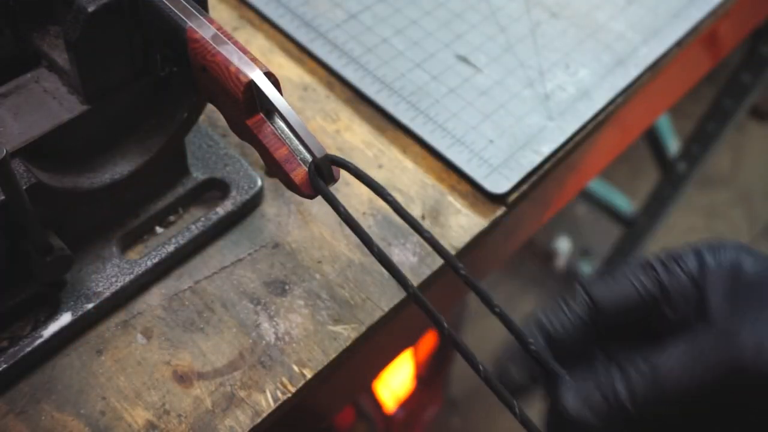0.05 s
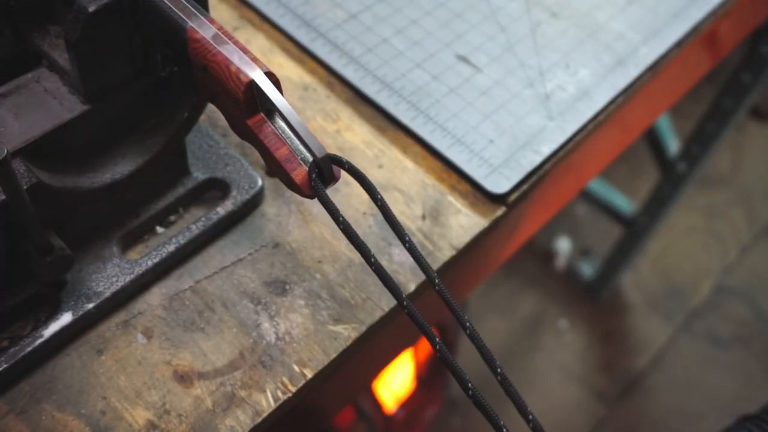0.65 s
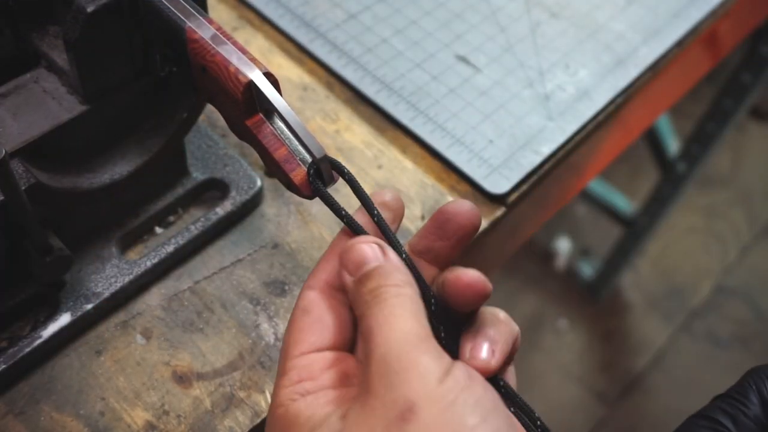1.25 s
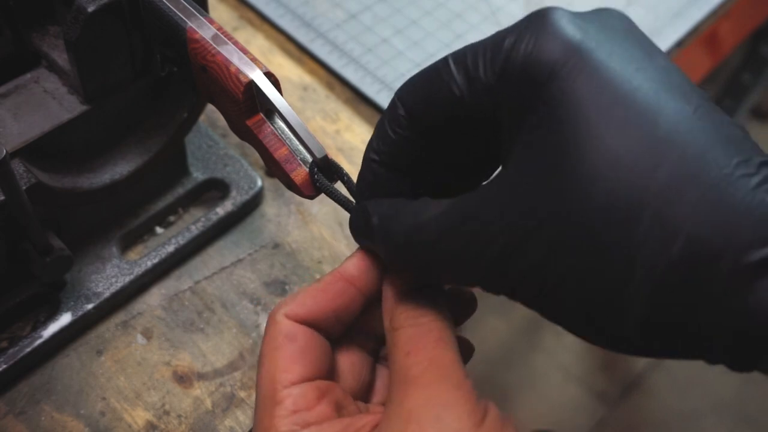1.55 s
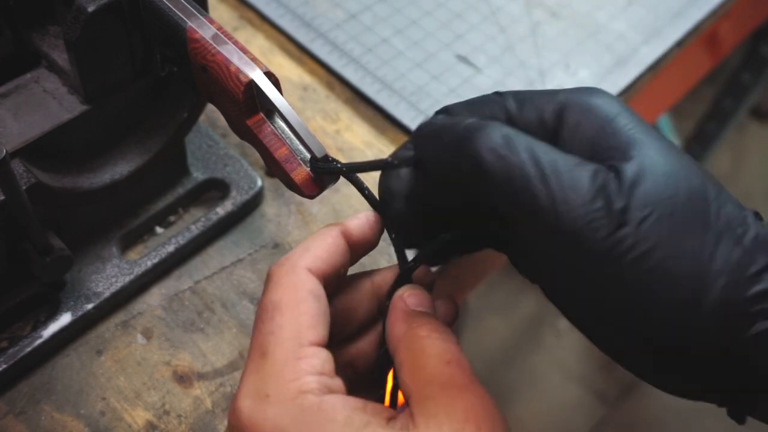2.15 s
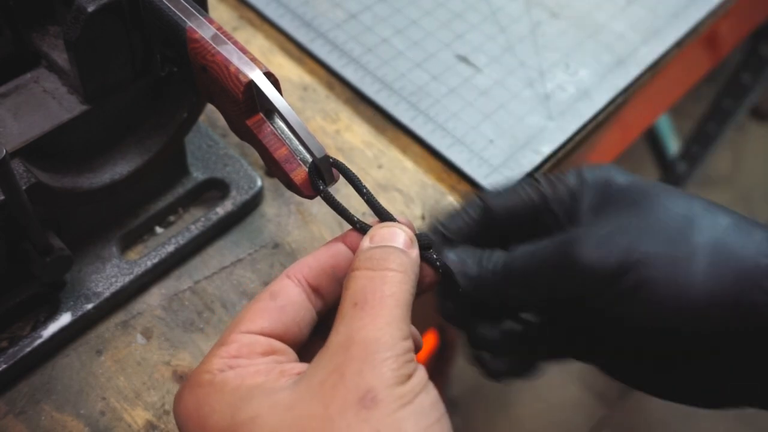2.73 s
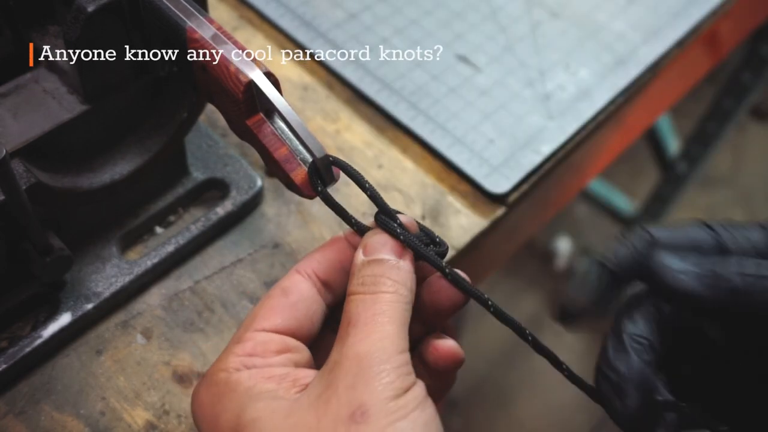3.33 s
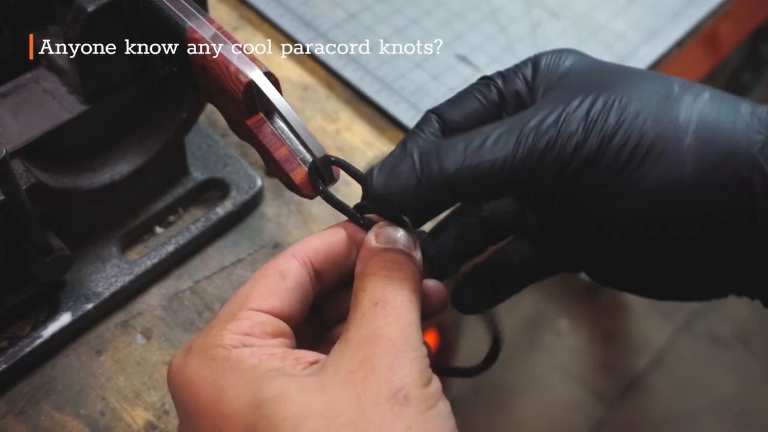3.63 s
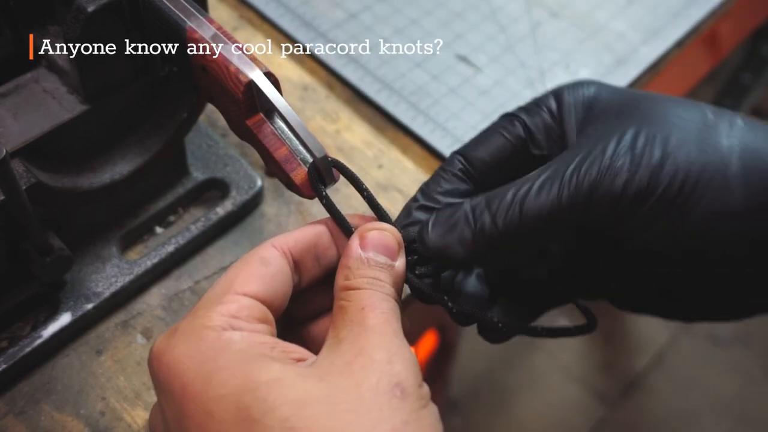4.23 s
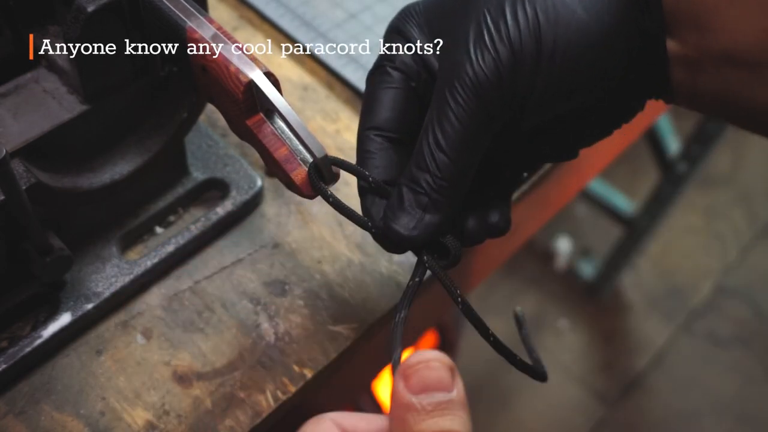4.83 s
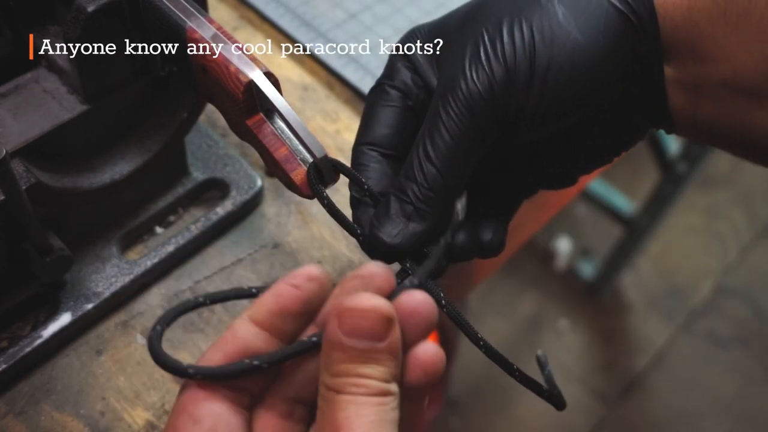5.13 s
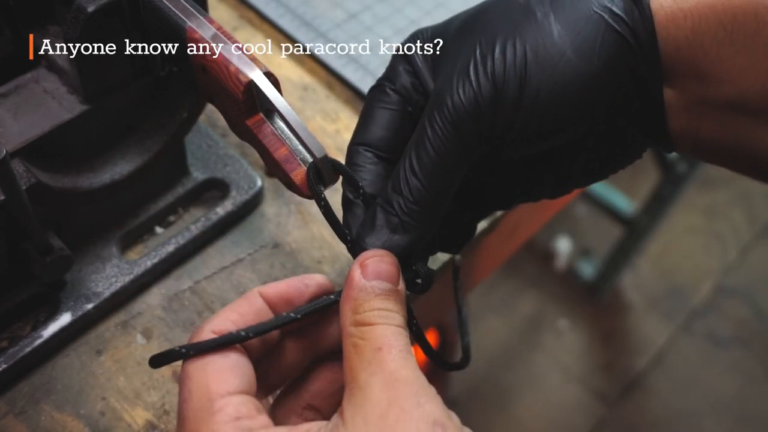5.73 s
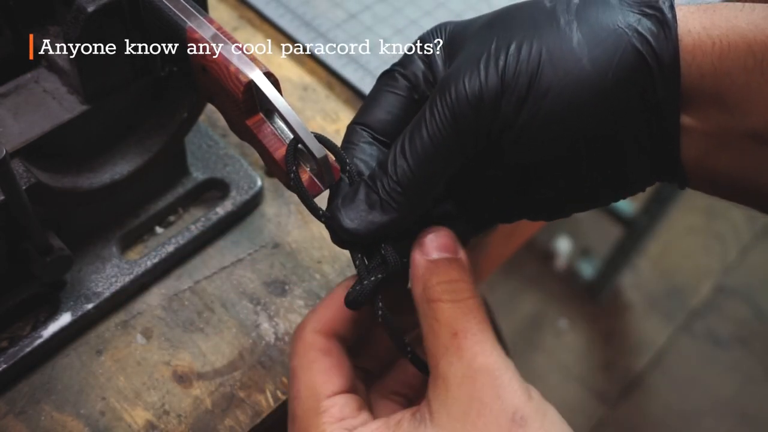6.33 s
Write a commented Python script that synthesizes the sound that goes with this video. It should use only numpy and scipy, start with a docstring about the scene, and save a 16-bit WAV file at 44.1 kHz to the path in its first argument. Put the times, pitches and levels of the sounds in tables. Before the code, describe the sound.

Nylon cord is pulled through a knife handle and knotted, with close hissing slides, finger rubs and small clicks.

```python
"""Threading a knife lanyard

Braided nylon cord is drawn through the hole of a knife handle held in a vice, then knotted, close up.
Each pull or finger rub is a swell of tiny fibre slips: a bright hiss from the sheath over a duller
rub of glove and hand. Fibres tick, fingers knock the handle and arms rustle. Behind it all sit
a low workshop rumble, a thin whine and a faint insect-like chirp."""
import sys
import numpy as np
from scipy import signal
from scipy.fft import rfft, irfft, next_fast_len
from scipy.io import wavfile
from scipy.ndimage import uniform_filter1d

SR = 44100
rng = np.random.default_rng(int(sys.argv[2]) if len(sys.argv) > 2 else 0)


def generate_wav(sig):
    """Save sig (samples, or channels by samples) to the path in sys.argv[1] as 16-bit PCM at SR."""
    pcm = np.round(np.clip(np.atleast_2d(sig).T, -1, 1) * 32767).astype(np.int16)
    wavfile.write(sys.argv[1], SR, pcm)


N = 285768

# bright tone of the sliding nylon sheath: (frequency [Hz], level [dB])
SHEATH = [(40, -74), (400, -25.5), (1500, -17), (2400, -13.5), (3150, -8.5), (4000, -5.5), (5000, -4),
          (8000, 0.5), (10500, 2), (16000, -0.5)]


def braid(speed, glove_db, slow_tilt_db, fast_tilt_db):
    """Cord catches and runs: fine slips hiss in the sheath, coarser ones rasp in the glove."""
    # dull tone of the rubbing glove: (frequency [Hz], level [dB])
    glove_tone = [(60, -35), (150, -25), (450, -8), (900, -10), (1400, -9.5), (1950, -1.5), (2550, -1.5),
                  (3200, -2.5), (4300, -1.5), (6000, -8.5), (16000, -54)]
    grip = undb(2.5 * walk(len(speed), rate=170)) * speed ** 0.85
    fine = echoes(slips(speed, rate=10000, spread_db=4.8, shared=0.2), t60=.012, wet_db=-7.5)
    hiss = (1 - speed) * colour(fine, SHEATH, slow_tilt_db) + speed * colour(fine, SHEATH, fast_tilt_db)
    coarse = echoes(slips(speed, rate=2500, spread_db=5.0, shared=0.2), t60=.025, wet_db=-3.5)
    rub = colour(coarse, glove_tone)
    return (unit(hiss * grip) + undb(glove_db) * unit(rub * grip)) * rms(speed)


def draws(stop_db_per_s=397):
    """Cord runs through the hole, louder and brighter the faster it goes, and stops quickly."""
    # effort curves of three pulls: (time [s], level [dB])
    first_draw = [(0.0, -32), (0.168, -28.5), (0.316, -39.5), (0.416, -38), (0.42, -34.5), (0.56, -45.5),
                  (0.664, -41), (0.83, -49.5), (0.88, -58)]
    quick_draw = [(2.28, -25), (2.31, -33), (2.362, -23), (2.416, -29.5), (2.434, -43), (2.5, -50)]
    last_draw = [(6.015, -43), (6.123, -34), (6.133, -30.5), (6.161, -30), (6.171, -43.5), (6.2, -48)]
    # (effort curve, gain [dB], slow tilt [dB/octave], fast tilt [dB/octave], glove over hiss [dB])
    pulls = [(first_draw, 3.26, -3.5, .8, -19),
             (quick_draw, 3.8, -1.9, 2.5, -15),
             (last_draw, 4.9, 0, 8, -23)]
    out = np.zeros((2, N))
    for curve, gain_db, slow_tilt_db, fast_tilt_db, glove_db in pulls:
        times, effort_db = np.transpose(curve)
        start, end = times[0], times[-1]
        t = start - .1 + np.arange(next_fast_len(int((end - start + .2) * SR))) / SR
        db = np.interp(t, times, effort_db) - stop_db_per_s * np.abs(t - t.clip(start, end))
        speed = undb(db - db.max())
        add(out, t[0], undb(db.max() + gain_db) * braid(speed, glove_db, slow_tilt_db, fast_tilt_db))
    return out


def stroke(s, rise, fall, db, glove_db, tilt_db):
    """One short slide that is fastest at time s; returns its start time and its sound."""
    t = np.arange(next_fast_len(int(3 * (rise + fall) * SR))) / SR - 3 * rise
    speed = np.exp(-np.abs(t / np.where(t < 0, rise, fall)) ** 1.26)
    return s + t[0], undb(db) * braid(speed, glove_db, tilt_db, tilt_db)


def rubs(rise_s=.016):
    """Fingers shift their hold along the cord: soft swells, duller the harder the glove presses."""
    # finger slides: (peak time [s], fall [s], level [dB], glove over hiss [dB])
    slides = [(.505, .02, -38, -19), (.655, 0.058, -42, -11), (1.62, 0.0084, -31, -13.5),
              (2.04, 0.063, -41, -5), (2.266, .03, -27.5, -6), (2.633, 0.032, -28, -17.5),
              (2.677, 0.017, -25, -13.5), (2.717, 0.053, -33, -12.5), (2.812, .012, -29.5, -12),
              (2.84, .028, -31, -8.5), (2.944, 0.011, -42, -5), (2.985, .015, -33.5, -14),
              (3.056, 0.01, -28.5, -17.5), (3.265, 0.027, -32.5, -17), (3.303, 0.042, -28, -12.5),
              (3.393, .018, -25.5, -10.5), (3.476, 0.026, -26.5, -13.5), (3.573, 0.017, -33.5, -9.5),
              (3.603, 0.042, -36, -5.5), (3.735, 0.012, -56, 15), (3.807, 0.027, -37, -5),
              (4.155, .04, -37.5, -11), (4.242, 0.042, -38.5, -7.5), (4.731, 0.034, -41.5, 1),
              (4.903, 0.063, -35, -19), (5.04, 0.043, -39, -20), (5.123, 0.011, -29.5, -29),
              (5.202, 0.015, -37, -22), (5.255, 0.031, -38.5, -18), (5.38, 0.022, -40, -14),
              (6.435, 0.038, -33.5, -10)]
    out = np.zeros((2, N))
    for s, fall, db, glove_db in slides:
        add(out, *stroke(s, rise_s, fall, db, glove_db, tilt_db=-2.5 - 0.19 * glove_db))
    return out


def tugs(rise_s=.0035):
    """The cord is jerked taut against the handle: a dark rasp that bites at once."""
    # jerks: (peak time [s], fall [s], level [dB], glove over hiss [dB])
    jerks = [(2.156, .053, -29, 1.5), (3.23, .014, -24.5, -10.5), (3.786, .011, -30, -1)]
    out = np.zeros((2, N))
    for s, fall, db, glove_db in jerks:
        add(out, *stroke(s, rise_s, fall, db, glove_db, tilt_db=-4))
    return out


def snags(rise_s=.0037, fall_s=.0056):
    """The braid snags and jumps free: a scratch that is over in milliseconds."""
    # catches: (peak time [s], level [dB], tilt [dB/octave])
    catches = [(.425, -25.5, 7), (1.974, -21.5, 6.5), (2.108, -24, -2.5), (2.12, -32.5, -4),
               (2.204, -25, 7), (2.264, -9.5, 2.5), (2.609, -30, 0), (2.975, -27.5, 0), (3.183, -32.5, 0),
               (3.397, -20.5, 5), (3.491, -26, 3), (3.545, -26.5, -2), (4.585, -20, -1.8),
               (6.02, -32.5, -4.5), (6.137, -26, 7)]
    out = np.zeros((2, N))
    for s, db, tilt_db in catches:
        add(out, *stroke(s, rise_s, fall_s, db, glove_db=-20.5, tilt_db=tilt_db))
    return out


def feeding(uneven_db=2.7):
    """The cord creeps through the fingers all the while, faint and uneven."""
    # how busily the fingers feed it: (time [s], level [dB])
    effort = [(.85, -47), (1.3, -46.5), (1.8, -45), (2.55, -49.5), (3.13, -42.5), (3.7, -48), (3.97, -42),
              (4.4, -51), (4.62, -42.5), (5.06, -47), (5.52, -59), (5.76, -43), (5.95, -51), (6.48, -48)]
    size = next_fast_len(N)
    db = np.interp(np.arange(size) / SR, *np.transpose(effort)) + uneven_db * walk(size, rate=18)
    speed = undb(db - db.max())
    return undb(db.max()) * braid(speed, glove_db=-11, slow_tilt_db=3.5, fast_tilt_db=3.5)[:, :N]


def zips():
    """Taut cord zips over an edge, its ribs blurring into a narrow, bright band."""
    # runs over the edge: (peak time [s], half length [s], level [dB], pitch [Hz])
    runs = [(.035, .04, -35.5, 5970), (.145, 0.086, -31.5, 9700), (.35, 0.23, -57.5, 3000),
            (2.174, .02, -34, 1930), (2.264, 0.0024, -17, 8260), (2.358, 0.019, -30.5, 3260),
            (2.402, .014, -36.5, 2630), (2.45, 0.019, -43.5, 3120), (3.598, 0.02, -40.5, 4100),
            (4.585, 0.0047, -27.5, 6200)]
    return swells(runs, width=0.31, rate=9000, trim_db=0.5)


def ticks(ring_t60=0.0078, body_db=-7):
    """Fibres and glove snap free: a sharp click with a very short, broad ring."""
    # snaps: (time [s], peak level [dB], pitch [Hz], left minus right [dB])
    snaps = [(0.2977, -20, 11100, 1), (0.923, -25.5, 4000, 0), (1.5414, -23, 11400, 7),
             (1.7863, -22, 10300, -3), (1.8228, -19.5, 3600, 2), (1.9709, -14, 11300, 3),
             (2.2623, -5, 8100, 1), (3.91, -17.5, 12000, 6), (4.0382, -20, 15300, 7),
             (4.239, -18, 12400, 1), (5.7357, -13, 15200, 5), (6.1335, -20, 14600, 0.5)]
    out = np.zeros((2, N))
    for s, db, hz, pan_db in snaps:
        click = echoes(signal.unit_impulse(2048), ring_t60, wet_db=6)
        body = undb(body_db) * resonate(click, hz=5100, width_hz=3500)
        tick = resonate(click, hz, 0.25 * hz) + body
        add(out, s + 0.0011, tick / np.abs(tick).max() * undb(db), pan_db)
    return out


def knocks():
    """Fingers and cord strike the clamped handle: soft bumps ring its low modes, flicks the high."""
    # strikes: (time [s], level [dB], contact time [s])
    strikes = [(1.822, -40, 0.000079), (2.155, -34.5, 0.0014), (3.231, -27, 0.004), (3.696, -41, 0.00019),
               (3.786, -33, 0.00048), (3.898, -33.5, 0.00016), (3.951, -39.5, 0.00021),
               (4.039, -37, 0.000093), (4.377, -37.5, 0.00012), (5.736, -35.5, 0.00011)]
    # modes of handle and vice: (frequency [Hz], level [dB], t60 [s])
    modes = [(147, -1, 0.082), (472, -3, .05), (829, -2, 0.06), (1730, -8, 0.015), (2040, 0, .014),
             (2820, 2, 0.011), (4140, -3, 0.014), (6040, -6, .01)]
    out, t = np.zeros((2, N)), np.arange(SR // 4) / SR
    for s, db, contact in strikes:
        for hz, mode_db, t60 in modes:
            push = np.exp(-np.log(2 * hz * contact) ** 2)  # half a period of contact drives it best
            ring = np.sin(2 * np.pi * hz * t) * np.exp(-np.log(1000) * t / t60)
            add(out, s, ring[None] * push * undb(db + mode_db))
    return out


def arms():
    """Cloth and skin brush as the arms shift: a soft, dull, uneven rustle."""
    # arm moves: (peak time [s], half length [s], level [dB], centre [Hz])
    moves = [(.95, .2, -54, 305), (.92, 0.068, -54.5, 800), (1.14, 0.082, -53, 786),
             (2.25, .09, -49.5, 1040), (2.3, .13, -54, 330), (3.33, .16, -53, 478), (4.2, .2, -54, 288),
             (4.87, .045, -53.5, 790), (5.379, 0.15, -54, 266), (5.8, 0.87, -53.5, 180)]
    return swells(moves, width=0.76, rate=2000, trim_db=2.5)


def fidget(db=-57.5):
    """Glove and cord crackle, sparse and faint, under the pulls."""
    activity = undb(2.9 * walk(N, rate=20))
    crackle = slips(activity, rate=200, spread_db=8, shared=.6) * activity
    return undb(db) * colour(echoes(crackle, t60=.005, wet_db=3), SHEATH, tilt_db=-4)


def workshop(level_db=-44, wide_hz=400):
    """Room tone: a centred rumble, wide hiss above it and a thin, steady whine."""
    # tone of the room: (frequency [Hz], level [dB])
    room_tone = [(20, -6), (50, -2), (90, 0), (160, -3), (300, -8), (500, -17), (1000, -19.5), (2000, -23),
                 (4000, -23), (7000, -24.5), (12000, -24), (16000, -25)]
    # bands of the whine: (centre [Hz], width [Hz], level [dB])
    whine = [(13650, 110, -60.5), (15200, 110, -55)]
    mid, side = rng.standard_normal((2, N))
    f = freqs(side)
    side = irfft(rfft(side) * (f / np.hypot(f, wide_hz)) ** 1.24, N)  # keeps the bass centred
    air = colour(np.array([mid + side, mid - side]), room_tone)
    air *= undb(level_db + .5 * walk(N, rate=8.4))
    for hz, width_hz, db in whine:
        air += undb(db) * unit(resonate(rng.standard_normal((2, N)), hz, width_hz))
    return air


def chirps(hz=11280, width_hz=620, db=-49):
    """A narrow high rasp, like a far bush cricket, a little more than once a second."""
    # chirps: (start [s], end [s])
    spans = [(.5, .74), (1.53, 1.72), (2.4, 2.55), (2.97, 3.16), (3.82, 3.99), (4.58, 4.76), (5.6, 5.78),
             (6.44, 6.48)]
    t = np.arange(N) / SR
    gate = sum(1. * ((t > start) & (t < end)) for start, end in spans)
    singing = uniform_filter1d(gate, size=900)
    rasp = slips(singing.clip(0), rate=7300, spread_db=4, shared=0.33)
    rasp = resonate(resonate(rasp, hz, width_hz), hz, width_hz)
    return unit(rasp) * np.sqrt(np.mean(singing)) * singing * undb(db + 2 * walk(N, rate=100))


def swells(table, width, rate, trim_db):
    """Slips gathered round one pitch, swelling and fading; width is a fraction of that pitch."""
    out = np.zeros((2, N))
    for s, half_length, db, hz in table:
        t = np.arange(next_fast_len(int(5 * half_length * SR), real=True)) / SR - 2.5 * half_length
        speed = np.exp(-(t / half_length) ** 2)
        brush = slips(speed, rate, spread_db=4, shared=0.44)
        brush = resonate(resonate(brush, hz, width * hz), hz, width * hz) * speed ** 0.51
        add(out, s + t[0], unit(brush) * rms(speed) * undb(db + trim_db))
    return out


def slips(speed, rate, spread_db, shared):
    """Friction clicks of uneven size, denser with speed; a share reaches both sides alike."""
    shape = (3, len(speed))  # left, right, centre
    happens = rng.random(shape) < rate * np.sqrt(speed) / SR
    signs = rng.choice([-1, 1], shape)
    clicks = happens * signs * undb(spread_db * np.clip(rng.standard_normal(shape), -2, 2))
    return np.sqrt(shared) * clicks[2] + np.sqrt(1 - shared) * clicks[:2]


def at_hand(x):
    """Pan a sound to follow the working hand."""
    # hand position: (time [s], left minus right [dB])
    hand_path = [(0, -2.5), (.16, -4), (.45, -1), (2.15, 0.5), (2.27, -0.5), (2.4, -5.5), (2.7, -6),
                 (2.95, 1.5), (3.24, 1.5), (3.39, -5), (3.6, -2), (3.8, 1.5), (4.2, -2), (4.65, 2),
                 (5.1, .5), (5.7, 8), (6.15, 0.5)]
    pan_db = np.interp(np.arange(N) / SR, *np.transpose(hand_path))
    gains = undb(np.array([pan_db, -pan_db]) / 2)
    return x * gains / np.sqrt(np.mean(gains ** 2, axis=0))


def echoes(x, t60, wet_db):
    """A sound plus its dense reflections, which differ left and right."""
    t = np.arange(int(t60 * SR) + 2) / SR
    response = rng.standard_normal((2, len(t))) * np.exp(-np.log(1000) * t / t60)
    response *= undb(wet_db) / np.sqrt(np.sum(response ** 2, axis=1, keepdims=True))
    response[:, 0] += 1
    return signal.fftconvolve(np.atleast_2d(x), response, axes=1)[:, :x.shape[-1]]


def colour(x, points, tilt_db=0):
    """EQ through (Hz, dB) points, with a tilt per octave above 600 Hz; rms 1."""
    hz, db = np.transpose(points)
    octave = np.log2(freqs(x))
    gain_db = np.interp(octave, np.log2(hz), db) + tilt_db * np.maximum(octave, np.log2(600))
    return unit(irfft(rfft(x) * undb(gain_db), x.shape[-1]))


def resonate(x, hz, width_hz):
    """One resonance, gain 1 at its centre."""
    f = freqs(x)
    return irfft(rfft(x) / (1 + 1j * (f * f - hz * hz) / (f * width_hz)), x.shape[-1])


def walk(size, rate):
    """Random drift of spread near 1 that turns rate times a second."""
    steps = np.arange(size) * rate / SR
    knots = rng.standard_normal(int(steps[-1]) + 2)
    return np.interp(steps, np.arange(len(knots)), knots)


def add(out, s, x, pan_db=0):
    """Mix a sound in at time s, leaning left by pan_db."""
    i = int(s * SR)
    a, b = max(i, 0), min(i + x.shape[1], N)
    out[:, a:b] += x[:, a - i:b - i] * unit(undb(np.array([[pan_db], [-pan_db]]) / 2))


def freqs(x):
    """Frequencies of the spectrum of x, 1 Hz at the lowest."""
    return np.maximum(np.fft.rfftfreq(x.shape[-1], 1 / SR), 1)


def undb(db):
    """Decibels to gain."""
    return 10 ** (np.asarray(db) / 20)


def rms(x):
    """Root-mean-square level."""
    return np.sqrt(np.mean(x ** 2))


def unit(x):
    """Scale to rms 1."""
    return x / rms(x)


def scene():
    """Close handling in a small, fairly dead room."""
    cord = at_hand(draws() + rubs() + tugs() + snags() + feeding() + zips())
    handling = cord + ticks() + knocks() + arms() + fidget()
    return echoes(handling, t60=0.19, wet_db=-15.5) + workshop() + chirps()


def record(dry):
    """A steep low-pass shaves off the very top."""
    top_hz = 15800
    return signal.sosfilt(signal.ellip(10, .1, 70, top_hz, fs=SR, output="sos"), dry)


dry = scene()
out = record(dry)
generate_wav(out)
```